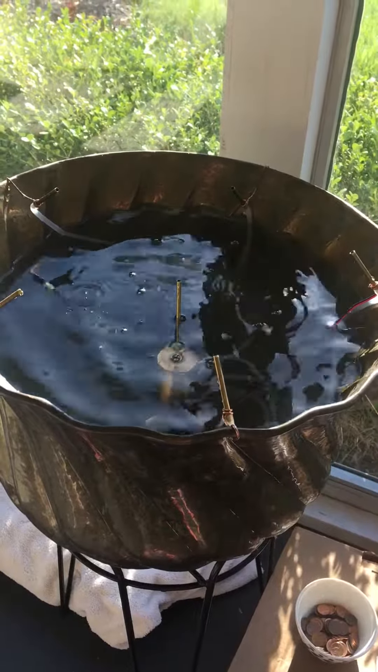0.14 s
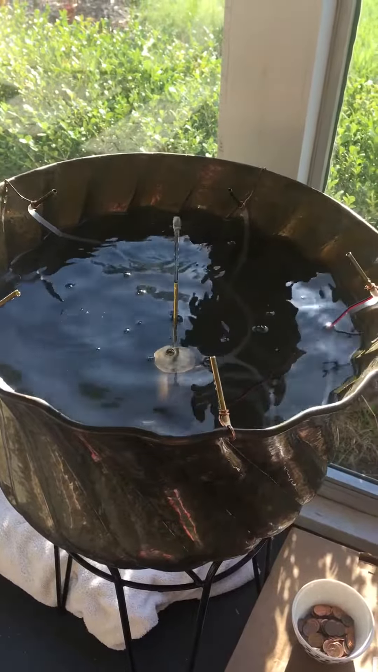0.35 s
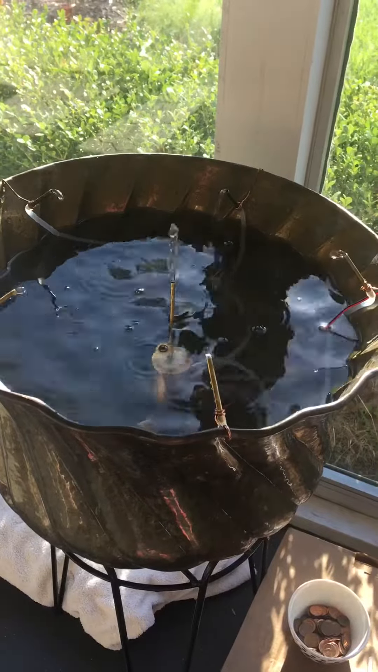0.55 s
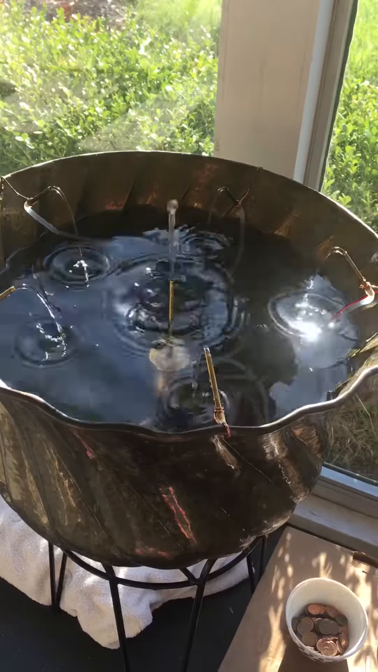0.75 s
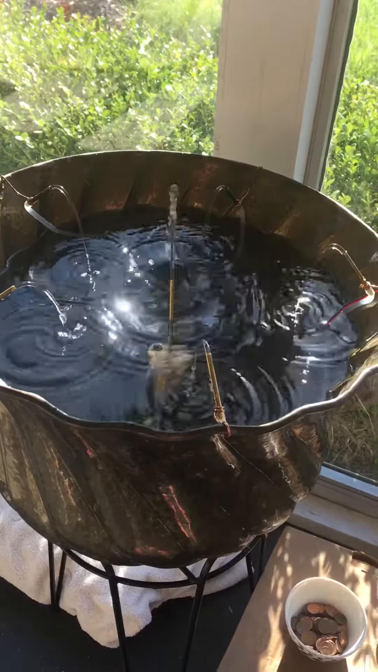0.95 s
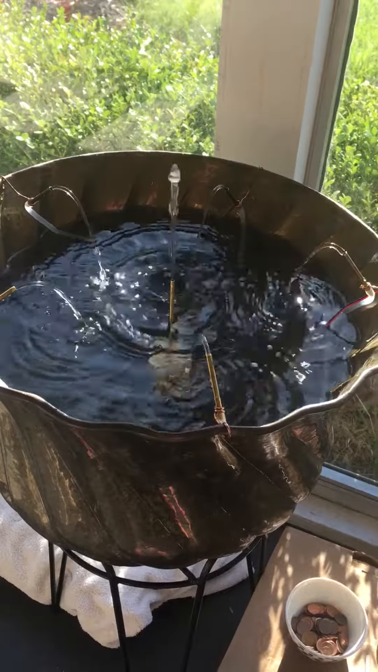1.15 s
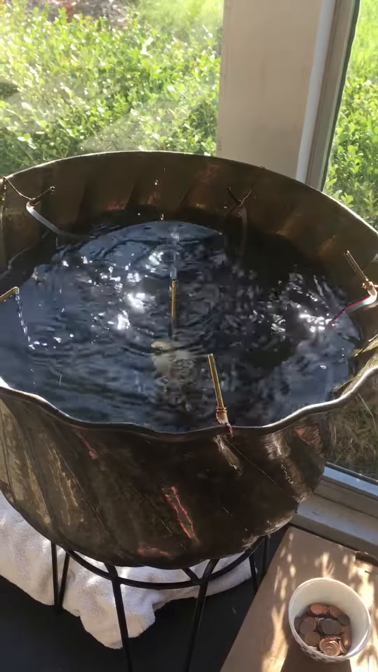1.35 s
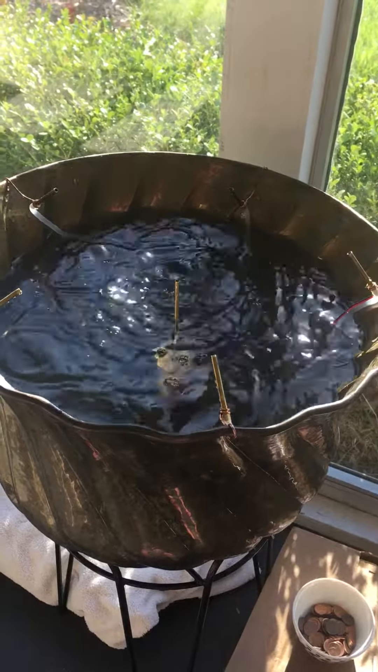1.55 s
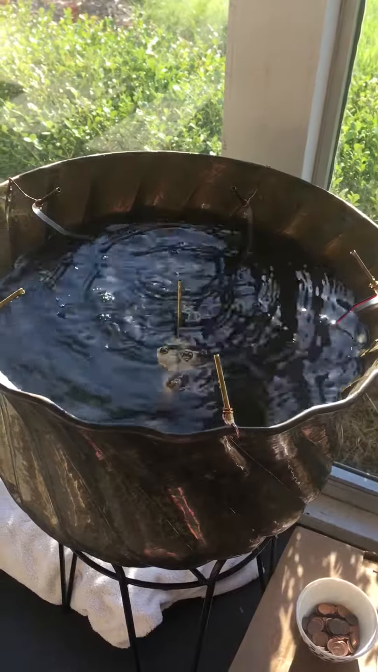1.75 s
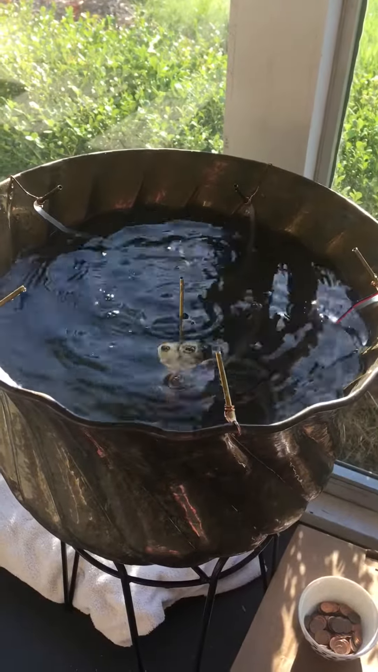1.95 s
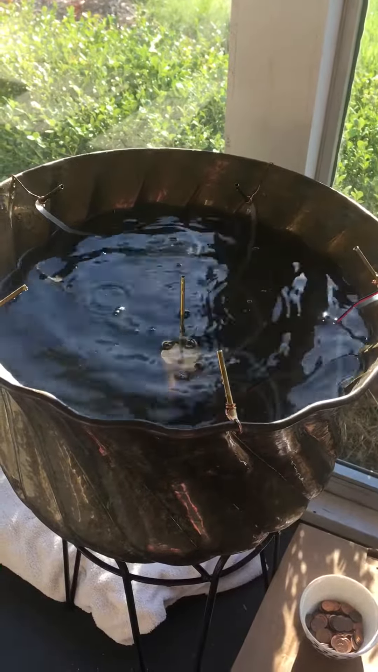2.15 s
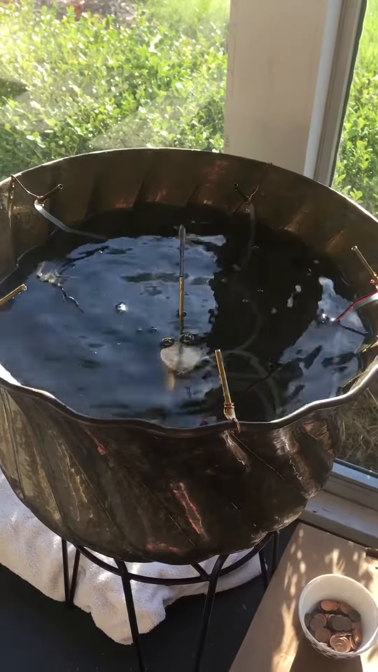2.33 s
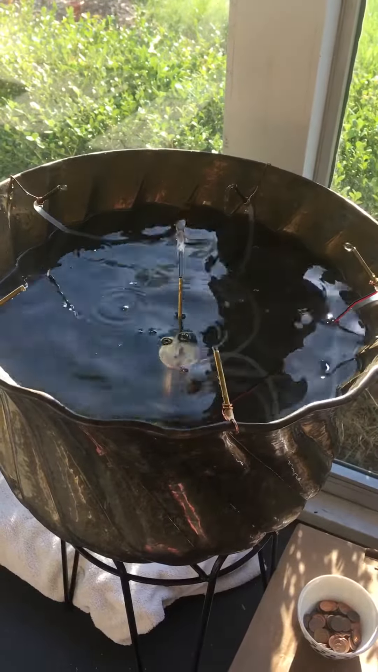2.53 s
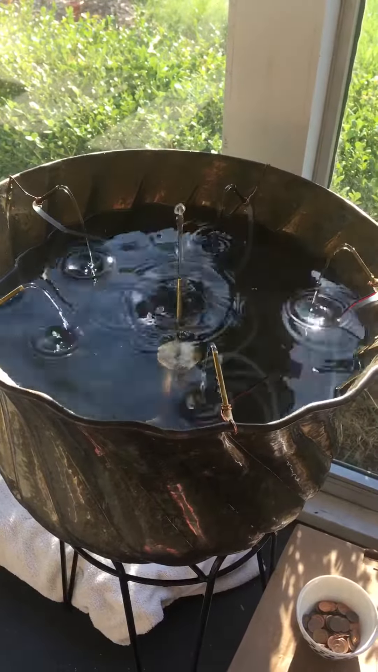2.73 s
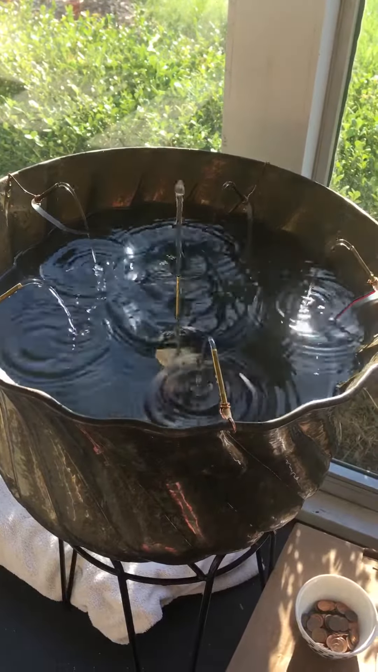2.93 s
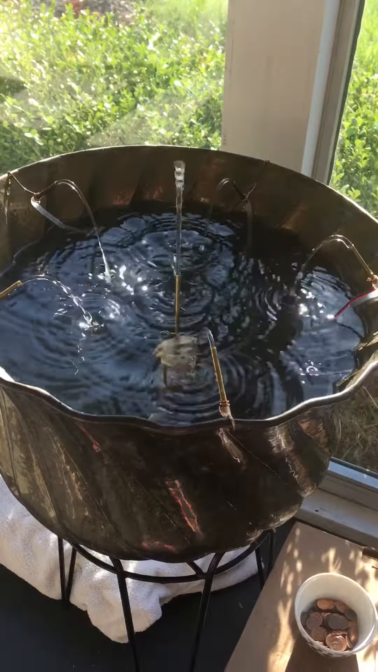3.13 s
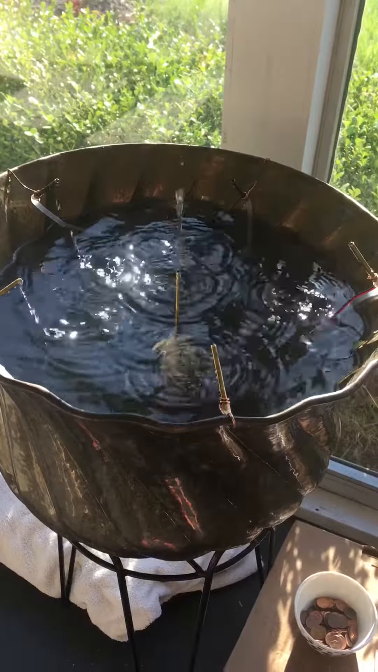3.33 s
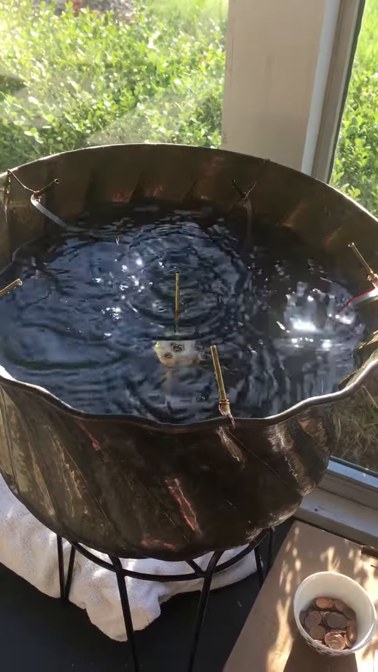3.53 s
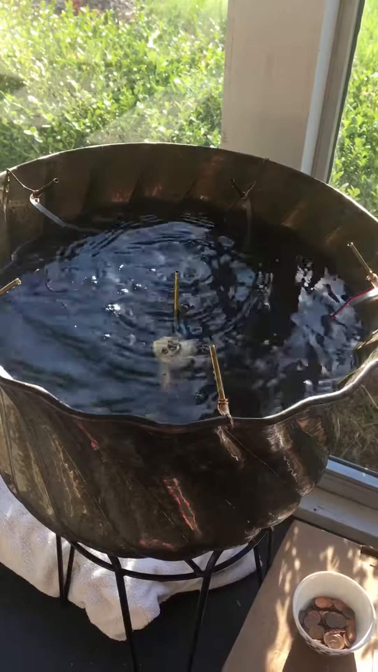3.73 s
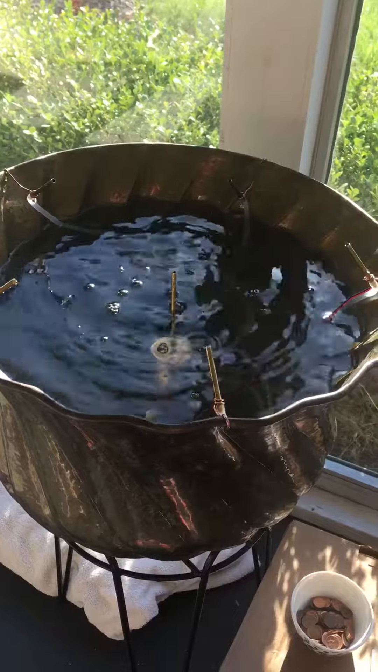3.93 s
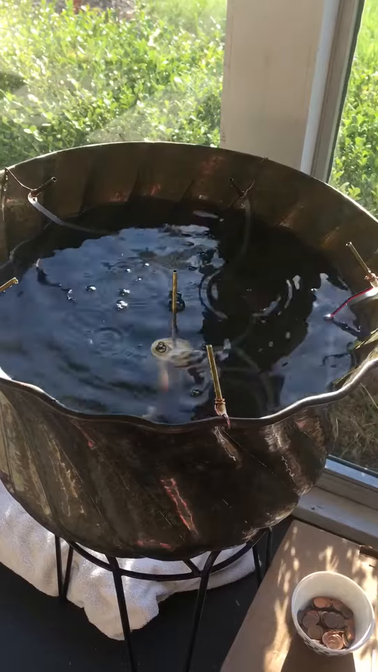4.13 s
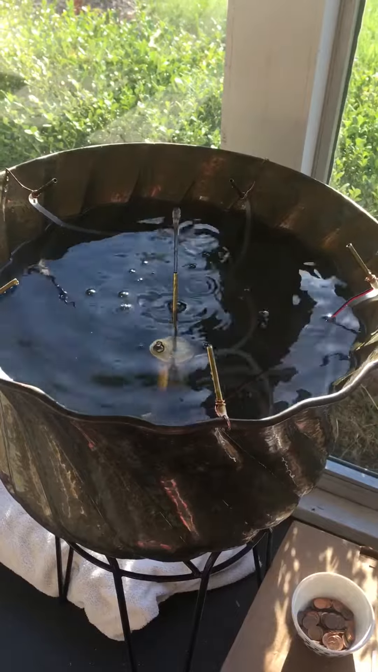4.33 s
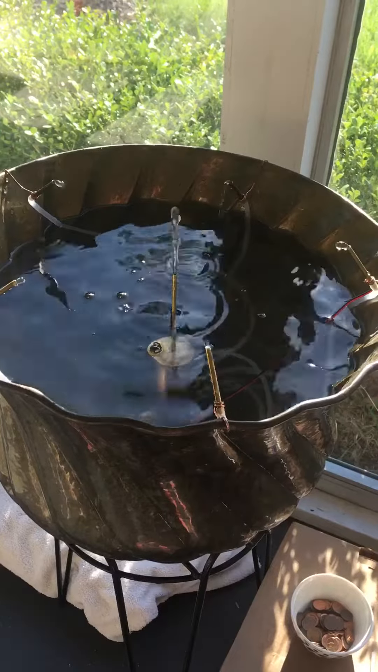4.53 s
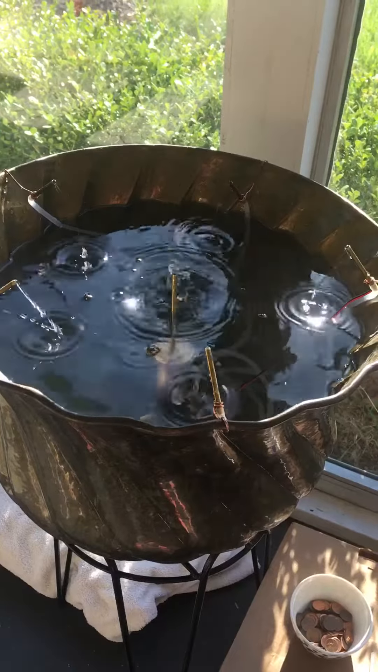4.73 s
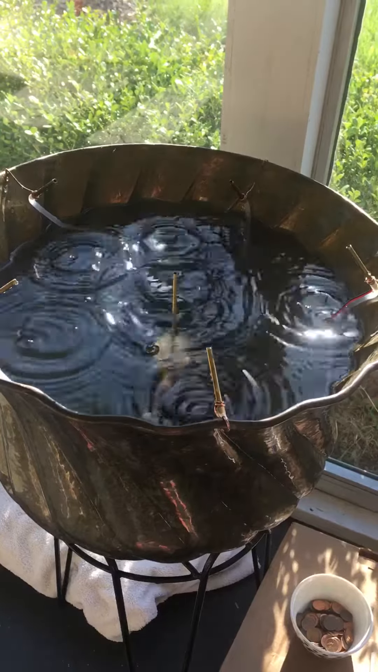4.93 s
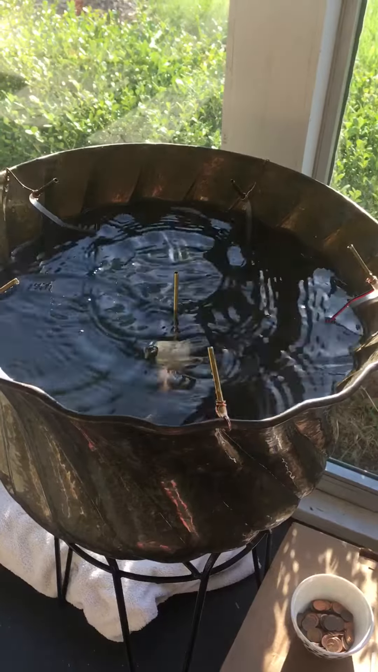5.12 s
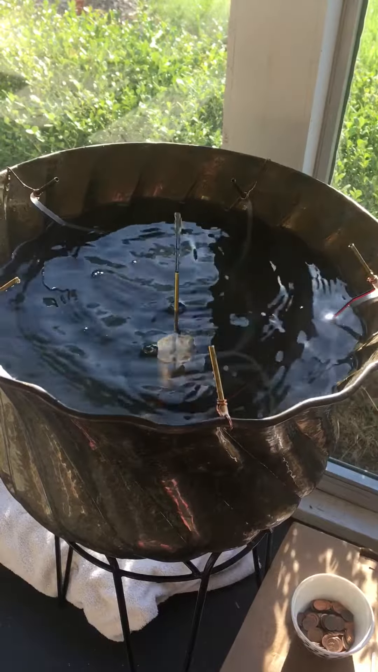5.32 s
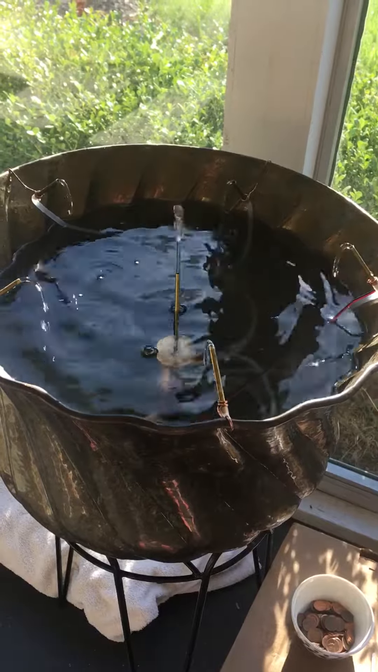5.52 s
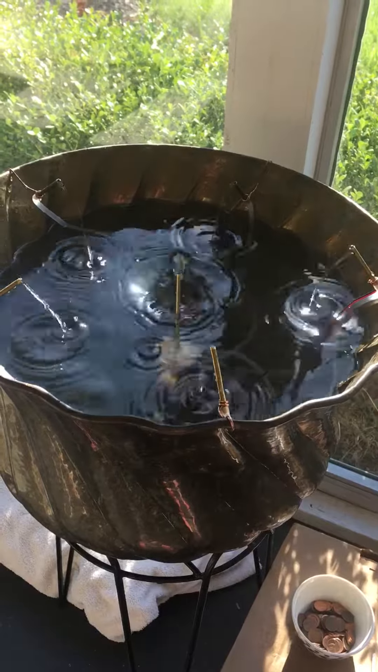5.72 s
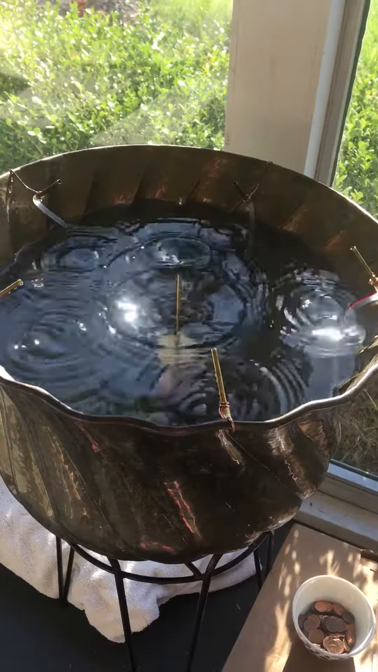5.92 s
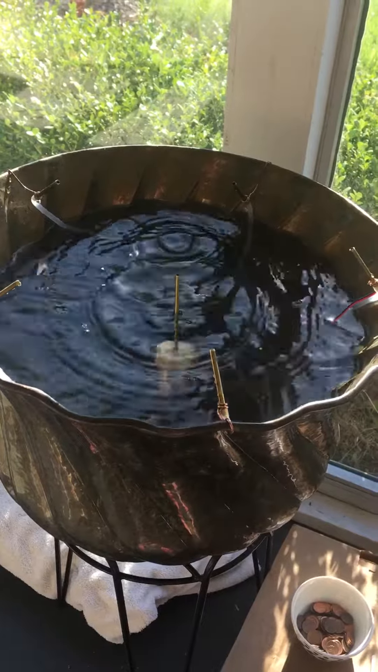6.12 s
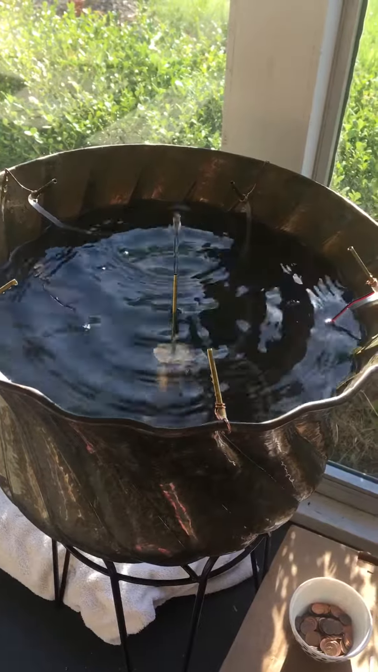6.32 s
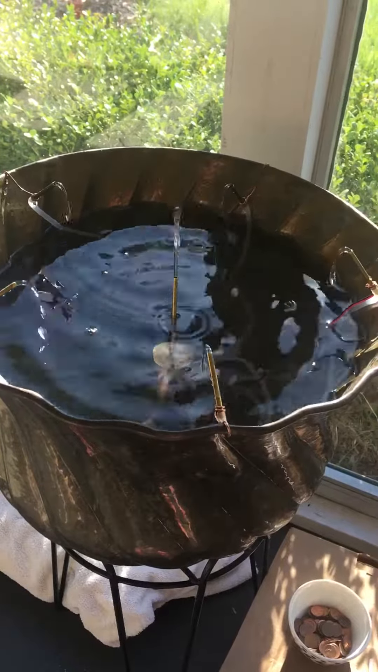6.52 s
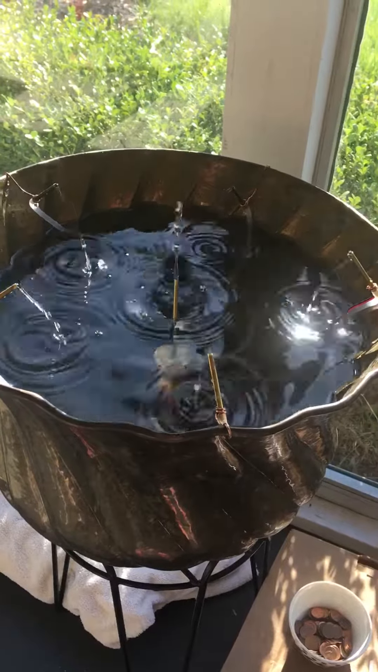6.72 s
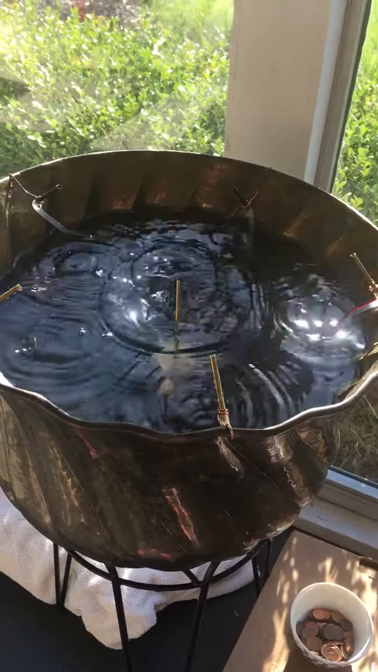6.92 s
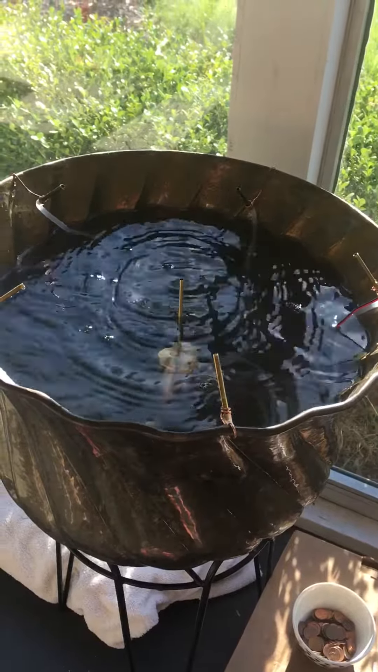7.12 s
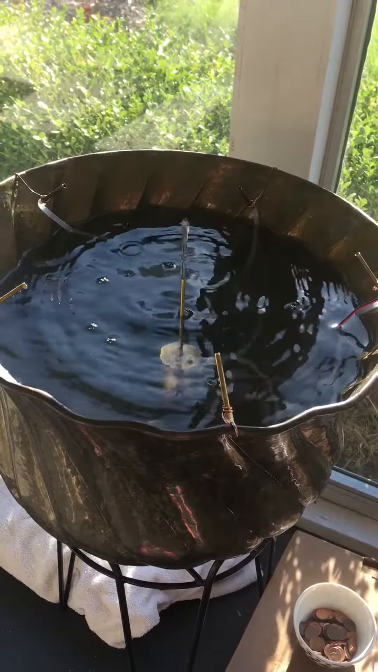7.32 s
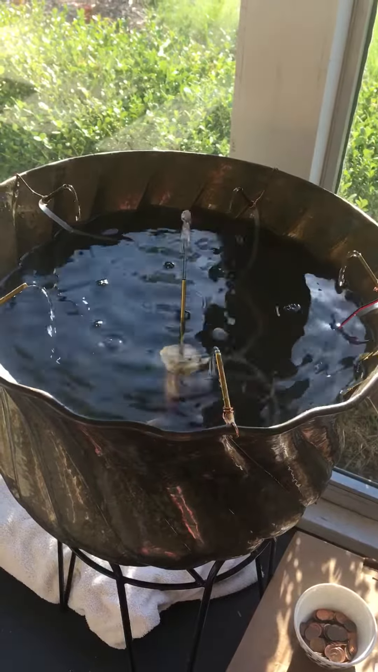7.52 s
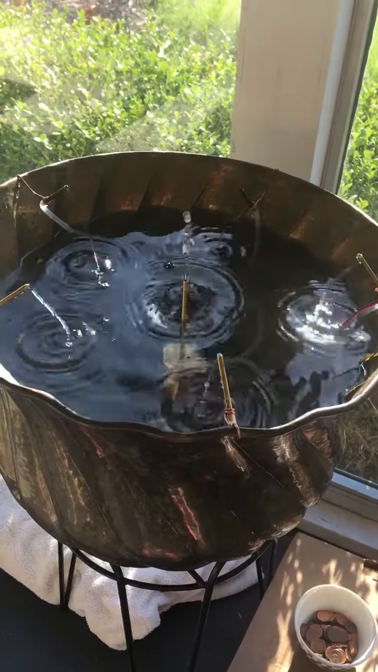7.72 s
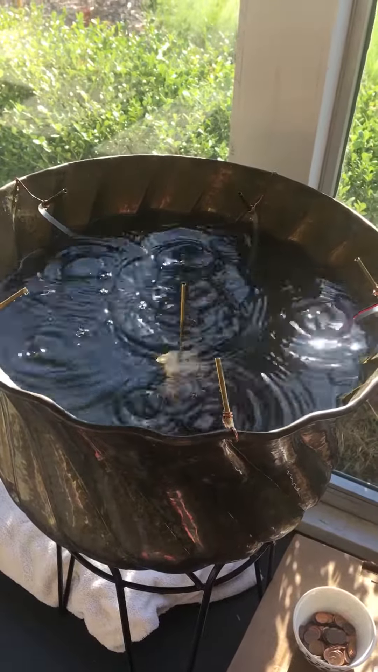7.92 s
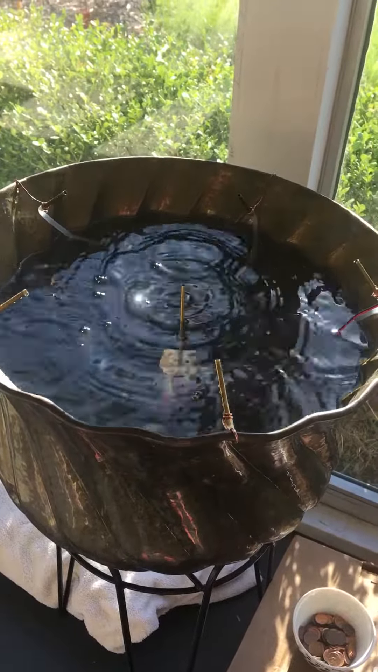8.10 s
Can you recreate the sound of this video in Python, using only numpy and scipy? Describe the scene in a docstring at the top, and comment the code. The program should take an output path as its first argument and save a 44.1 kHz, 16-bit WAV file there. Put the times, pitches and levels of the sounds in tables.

```python
"""A small table fountain plays in a metal bowl by a window: two long spurts, then four short ones.
Each spurt is a sum of decaying sines for rising bubbles, over sharp drops of ping and noise smack.
A relay that clicks the pump on and off is chattering noise in resonances; a board rings after it.
Noise tails give the bowl and a small live room. A vehicle drones past outside as engine orders and
road noise, and a faint sine hum and noise hiss stay throughout."""
import sys
import numpy as np
from scipy import signal
from scipy.fft import rfft, irfft, next_fast_len
from scipy.io import wavfile

SR = 44100
rng = np.random.default_rng(int(sys.argv[2]) if len(sys.argv) > 2 else 0)


def waveform_to_disk(signal):
    """Save audio, clipped to [-1, 1], as 16-bit WAV at the path in sys.argv[1]."""
    frames = np.transpose(np.atleast_2d(signal))
    scaled = np.clip(frames, -1, 1) * 32767
    samples = np.round(scaled).astype(np.int16)
    wavfile.write(sys.argv[1], SR, samples)


N = 364266
T = np.arange(N) / SR
CUTOFF_HZ = 16000   # top of the band
DROP_CYCLES = 29.3   # cycles in which a drop's ping decays by 60 dB


def amp(db):
    """Logarithmic level: decibels to amplitude gain."""
    return 10 ** (np.asarray(db) / 20)


def unit(x):
    """Normalisation: scale to an rms of 1."""
    return x / np.sqrt(np.mean(x ** 2) + 1e-20)


def in_time(rows):
    """Linear interpolation: each column of a time curve at every sample."""
    s, *columns = np.transpose(rows)
    return [np.interp(T, s, column) for column in columns]


def add(out, s, sound):
    """Superposition: mix a short sound in at time s."""
    i = max(0, int(s * SR))
    out[i:i + len(sound)] += sound[:max(0, N - i)]


def coloured(x, spectrum):
    """Spectral shaping: weight a steady signal over log frequency, then scale to an rms of 1."""
    hz, db = np.transpose(spectrum)
    size = next_fast_len(N)
    bins_hz = np.maximum(np.arange(size // 2 + 1) * SR / size, 1)
    gain = amp(np.interp(np.log(bins_hz), np.log(hz), db))
    return unit(irfft(rfft(x, size) * gain, size)[:N])


def drift(values_per_s):
    """Slow random modulation: straight lines between normal random values."""
    return np.interp(T * values_per_s, np.arange(N // 20), rng.standard_normal(N // 20))


def echoes(x, t60, delay_s):
    """Diffuse reverberation: dense reflections of unit energy start after a delay and decay."""
    t = np.arange(int(.6 * SR)) / SR
    tail = rng.standard_normal(len(t)) * amp(-60 * t / t60) * (t > delay_s)
    return signal.fftconvolve(x, tail / np.linalg.norm(tail))[:N]


# Swell of the hum. Each row: time in seconds, mean peak level in dB.
HUM_LEVEL = [(0, -62), (3.1, -61.5), (4.0, -70), (4.8, -73), (5.5, -60.5), (6.6, -58.5), (7.5, -66),
             (8.2, -68)]
# Spectrum of the hiss. Each row: frequency in Hz, relative density in dB per Hz.
HISS_SPECTRUM = [(100, 12), (400, 10.5), (1300, 2), (2500, 0), (4700, -6), (6300, 0.5), (9500, -8),
                 (15000, 3)]


def room_tone(hum_hz=103, hiss_db=-70.0):
    """Tone and noise floor: a wavering sine hum over faint coloured noise."""
    hum_db = in_time(HUM_LEVEL)[0] + 1.6 * drift(4.0)
    hum = amp(hum_db) * np.sin(2 * np.pi * hum_hz * T)
    return hum + amp(hiss_db) * coloured(rng.standard_normal(N), HISS_SPECTRUM)


# Engine outside. Each row: time in seconds, base rate in Hz, mean rms level of the firing tone in dB.
ENGINE_CURVE = [(0, 64.92, -64), (1.0, 66, -66), (1.7, 72, -56.5), (2.15, 73, -72), (2.65, 73.8, -48),
                (3.25, 74.35, -46), (3.55, 75, -63), (4.2, 65.64, -57.5), (4.7, 71.86, -62.5),
                (5.1, 73.3, -52), (5.38, 74.3, -65), (8.2, 73, -72.5)]
# Its overtones swell and fade as it moves. Each row: multiple of the base rate, time of the maximum
# in seconds, rms level there in dB, fall to either side in dB per second.
ENGINE_OVERTONES = [(3, .7, -63.5, 10), (2, 1.78, -58, 9.5), (3, 2.72, -57, 27), (4, 3.4, -67, 11)]
# Deep drone at the start. Each row: time in seconds, rms level in dB.
DRONE_LEVEL = [(0, -52.5), (.55, -57.5), (.9, -72.5)]
# Road noise. Each row: time in seconds, rms level in dB.
ROAD_LEVEL = [(0, -61), (1.2, -61), (2.7, -57.5), (3.7, -54.5), (4.8, -57.5), (5.7, -60.5), (6.6, -65.5),
              (8.2, -66.5)]
# Spectrum of the road noise. Each row: frequency in Hz, relative density in dB per Hz.
ROAD_SPECTRUM = [(22, -25), (45, -1), (80, 0.5), (170, -3.5), (260, -12), (450, -23), (1200, -24),
                 (2500, -35), (6000, -54)]


def traffic(waver_db=1.8, waver_hz=0.43):
    """Engine orders: tones locked to one rate, with dull road noise and a drone that soon sinks."""
    rate_hz, firing_db = in_time(ENGINE_CURVE)
    orders = [(0.98, firing_db)]   # the firing tone lies just below the base rate
    for order, peak_s, db, fall in ENGINE_OVERTONES:
        orders.append((order, db - fall * np.abs(T - peak_s)))
    phase = 2 * np.pi * np.cumsum(rate_hz + waver_hz * drift(6)) / SR
    engine = sum(amp(db + waver_db * drift(9.8)) * np.sin(order * phase) for order, db in orders)
    drone = amp(in_time(DRONE_LEVEL)[0]) * np.sin(2 * np.pi * 43 * T)
    road = amp(in_time(ROAD_LEVEL)[0]) * coloured(rng.standard_normal(N), ROAD_SPECTRUM)
    return np.sqrt(2) * (engine + drone) + road   # root 2 turns the tables' rms levels into sine peak amplitudes


# The relay pulls in. Each entry: time in seconds.
PULL_IN_TIMES = [.099, 2.098, 4.0965, 5.096, 6.095, 7.0946, 8.0937]
# Modes of the board under the relay. Each row: frequency in Hz, peak level in dB, 60 dB decay in seconds.
BOARD_MODES = [(783, -63.5, 0.39), (1105, -70, 0.56), (1830, -65.5, 0.21)]


def board():
    """Modal ringing: pulling in, the relay knocks the board it is mounted on."""
    out, t = np.zeros(N), np.arange(SR // 2) / SR
    knock = sum(amp(db - 60 * t / t60) * np.sin(2 * np.pi * hz * t) for hz, db, t60 in BOARD_MODES)
    for s in PULL_IN_TIMES:
        add(out, s, knock)
    return out


def resonance(x, hz, width_hz):
    """Damped resonator: a two-pole band-pass with gain 1 at its top."""
    r = np.exp(-np.pi * width_hz / SR)
    zeros = np.array([1, 0, -1]) * (1 - r * r) / 2
    poles = [1, -2 * r * np.cos(2 * np.pi * hz / SR), r * r]
    return signal.lfilter(zeros, poles, x)


# The relay lets go. Each entry: time in seconds.
LET_GO_TIMES = [1.0996, 3.099, 4.597, 5.5956, 6.596, 7.594]
# Modes of the relay body. Each row: frequency in Hz, relative level in dB pulling in, and letting go.
HOUSING_MODES = [(338, -50, -69), (880, -48, -62), (1160, -61.5, -79), (1930, -58.5, -59),
                 (3130, -54, -56.5), (3740, -55, -48), (5930, -45, -43), (6220, -67, -43.5),
                 (8560, -33, -72), (8750, -37, -36.5), (9400, -41, -31.5), (10160, -67.5, -40),
                 (13360, -48, -32), (14400, -47, -41), (14900, -42, -33)]


def relay(times, column, chatter_s, fall_db_per_s, width_hz=300):
    """Source and filter: contact chatter, nearly alike at every switch, excites the housing's modes."""
    out, t = np.zeros(N), np.arange(SR // 50) / SR
    attack = np.minimum(t / 0.00073, 1)
    shape = attack * amp(-fall_db_per_s * np.maximum(t - chatter_s, 0))
    strength = np.sqrt(np.mean(shape ** 2) / 2)
    habits = rng.standard_normal((len(HOUSING_MODES), len(t)))   # the part every switch shares
    for mode, habit in zip(HOUSING_MODES, habits):
        for s in times:
            chatter = shape * (habit + .5 * rng.standard_normal(len(t)))
            ringing = resonance(chatter, mode[0], width_hz + .025 * mode[0])
            add(out, s, amp(mode[column]) * unit(ringing) * strength)
    return out


def bubble(hz, t60, rise):
    """Bubble resonance: an air pocket rings, and with rise > 0 climbs as it nears the surface."""
    t = np.arange(int(t60 * SR) + 2) / SR
    pitch = np.minimum(hz * (1 + rise * t), CUTOFF_HZ)
    onset = 1 - np.exp(-t * hz / 0.7)
    return np.sin(2 * np.pi * np.cumsum(pitch) / SR) * amp(-60 * t / t60) * onset


def pop(hz, t60, ping_db=-9.0, smack_db=-7.5, smack_t60=0.001, edge=0.49):
    """Drop impact: a tiny bubble's ping and a short noise smack, with little sound below its pitch."""
    t = np.arange(SR // 100) / SR
    ping = np.sin(2 * np.pi * hz * t) * amp(-60 * t / t60)
    smack = rng.standard_normal(len(t)) * amp(-60 * t / smack_t60)
    smack *= np.linalg.norm(ping) / np.linalg.norm(smack)   # equal energy
    impact = amp(ping_db) * ping + amp(smack_db) * smack
    # two-pole high-pass near edge times the pitch, used twice
    r = np.exp(-2 * np.pi * edge * hz / SR / np.sqrt(2))
    poles = [1, -2 * r * np.cos(np.log(r)), r * r]
    zeros = np.array([1, -2, 1]) * (1 - poles[1] + poles[2]) / 4
    return signal.lfilter(zeros, poles, signal.lfilter(zeros, poles, impact))


# Falling water, one row per spurt. Each row: start in seconds, end in seconds, relative level of the
# deeper bubbles in dB, relative level of the spray and fine sounds in dB.
SPURT_TIMES = [(.74, 1.32, -50.5, -59), (2.71, 3.381, -50, -58), (4.595, 4.789, -66.5, -69.5),
               (5.634, 5.775, -48.5, -58.5), (6.621, 6.753, -49.5, -58.5), (7.63, 7.763, -51, -62.5)]


def foam(level_db=-38.7, spread_db=23, linger_s=.8, low_hz=7000, cycles=22, count=1100):
    """Inhomogeneous random process: count tiny film bursts gather to each spurt's end, then thin out."""
    rate = 0.17   # some bursts at any time; long spurts leave more
    for start, end, *_ in SPURT_TIMES:
        rate = rate + (end - start) * np.exp(-np.abs(T - end) / linger_s) * (T > start)
    chance = rng.random((count, 3))
    times = np.interp(chance[:, 0], np.cumsum(rate) / rate.sum(), T)
    out = np.zeros(N)
    for s, (_, size, strength) in zip(times, chance):
        hz = low_hz * (CUTOFF_HZ / low_hz) ** np.sqrt(size)
        db = level_db - spread_db * np.sqrt(strength)
        add(out, s, amp(db) * bubble(hz, cycles / hz, 0))
    return out


def fizz(level_db=13, spread_db=14, low_hz=2400, octaves=1.45, cycles=18, rise=60, overhang_s=.03,
         count=520):
    """Air entrainment: the splash whips in small short-lived bubbles, count per second of spurt."""
    out = np.zeros(N)
    for start, end, _, db in SPURT_TIMES:
        for when, size, strength in rng.random((int((end - start) * count), 3)):
            s = start + when * (end - start + overhang_s)
            hz = low_hz * 2 ** (octaves * size)
            gain = amp(db + level_db - spread_db * strength)
            add(out, s, gain * bubble(hz, cycles / hz, rise))
    return out


def spray(level_db=35, spread_db=30, count=420, low_hz=5200, cycles=28):
    """Droplet impacts: count a second land all through each spurt; most are faint, a few stand out."""
    out = np.zeros(N)
    for start, end, _, db in SPURT_TIMES:
        slots = np.arange(start, end, 1 / count)
        for s, (late, size, strength) in zip(slots, rng.random((len(slots), 3))):
            hz = low_hz * (CUTOFF_HZ / low_hz) ** size
            gain = amp(db + level_db - spread_db * np.sqrt(strength))
            add(out, s + late * 2 / count, gain * pop(hz, cycles / hz))
    return out


def chirps(level_db=23, spread_db=9, low_hz=2400, octaves=1.1, cycles=34, rise=70, lead_s=.015,
           linger_s=.06, fade_db_per_s=110, count=36):
    """Rising bubble resonance: drops trap small bubbles, count a second, fainter outside the spurt."""
    out = np.zeros(N)
    for start, end, _, db in SPURT_TIMES:
        slots = np.arange(start - lead_s, end + linger_s, 1 / count)
        for s, (late, size, lift, strength) in zip(slots, rng.random((len(slots), 4))):
            hz = low_hz * 2 ** (octaves * size)
            faded_db = fade_db_per_s * max(start - s, s - end, 0)
            gain = amp(db + level_db - faded_db - spread_db * strength)
            add(out, s + late / count, gain * bubble(hz, cycles / hz, rise * lift))
    return out


def patter(level_db=39.5, spread_db=9, low_hz=5000, high_hz=14500, soft_start_db=9, build_s=0.11,
           count=42):
    """Jet breakup: count drops a second, which hit harder once the jet has reached its full height."""
    out = np.zeros(N)
    for start, end, _, db in SPURT_TIMES:
        slots = np.arange(start, end, 1 / count)
        for s, (late, size, strength) in zip(slots, rng.random((len(slots), 3))):
            hz = low_hz * (high_hz / low_hz) ** np.sqrt(size)
            soft_db = soft_start_db * np.exp((start - s) / build_s)
            gain = amp(db + level_db - soft_db - spread_db * strength)
            add(out, s + late / count, gain * pop(hz, DROP_CYCLES / hz))
    return out


# Single drops: the first and last of a spurt and the hardest hits.
# Each row: time in seconds, pitch in Hz, relative level in dB.
SINGLE_DROPS = [(0.614, 14500, -23), (0.693, 5450, -31.5), (0.7255, 9500, -23.5), (0.753, 14500, -20.5),
                (0.8397, 13500, -23), (0.8832, 14600, -14.5), (0.8906, 11000, -23), (0.8968, 9100, -24),
                (.969, 14500, -20.5), (1.0376, 13400, -20), (1.0503, 4300, -26.5), (1.0907, 14400, -22),
                (1.1291, 5600, -18), (1.162, 14500, -17), (1.259, 9500, -21.5), (1.2926, 14200, -10.5),
                (1.3055, 6700, -15.5), (1.393, 14400, -15.5), (1.4054, 6460, -22.5), (2.6034, 8100, -32),
                (2.619, 7590, -26.5), (2.6676, 14800, -23), (2.7142, 7060, -17.5), (2.73, 13400, -15),
                (2.78, 9500, -15), (2.8184, 11500, -14), (2.8493, 12600, -15), (2.89, 11400, -19),
                (2.9516, 14110, -16), (2.9728, 6230, -18), (3.1451, 10900, -10), (3.2175, 6960, -25),
                (3.316, 9390, -19.5), (3.328, 4270, -23), (3.3949, 12100, -19), (4.702, 4540, -33.5),
                (4.7319, 9700, -14), (4.7553, 13640, -25), (4.8192, 13820, -12.5), (4.845, 5360, -37.5),
                (5.022, 11200, -37.5), (5.581, 4490, -41), (5.6112, 10600, -20.5), (5.754, 13100, -26),
                (6.5293, 15000, -25.5), (6.621, 7340, -23), (6.6466, 14560, -17), (6.686, 6100, -15.5),
                (6.7877, 3970, -28), (6.863, 4430, -32.5), (7.419, 9150, -41), (7.6312, 8900, -10),
                (7.647, 9700, -17), (7.663, 5800, -21), (7.7805, 9000, -30.5), (7.8206, 9250, -28)]


def drops(level_db=4.0):
    """Drop impact: the sharp single hits that stand out of each spurt."""
    out = np.zeros(N)
    for s, hz, db in SINGLE_DROPS:
        add(out, s, amp(db + level_db) * pop(hz, DROP_CYCLES / hz))
    return out


def gurgle(level_db=10.7, first_hz=2800, deepest_hz=1100, deepen_s=0.0488, octaves=1.94, cycles=42,
           rise=80, spread_db=13, count=210):
    """Size sets pitch: as the landing jet digs deeper, larger bubbles soon join in, count a second."""
    out = np.zeros(N)
    for start, end, db, _ in SPURT_TIMES:
        slots = np.arange(start, end, 1 / count)
        for s, (late, size, lift, strength) in zip(slots, rng.random((len(slots), 4))):
            lowest_hz = deepest_hz + (first_hz - deepest_hz) * np.exp((start - s) / deepen_s)
            hz = lowest_hz * 2 ** (octaves * size ** 2)
            gain = amp(db + level_db - spread_db * strength)
            add(out, s + late * 2 / count, gain * bubble(hz, cycles / hz, rise * lift))
    return out


def gulps(level_db=15.5, spread_db=8, first_hz=1550, deepest_hz=1050, deepen_s=0.198, octaves=0.808,
          cycles=52, rise=60, soft_start_db=9, build_s=0.14, count=34):
    """Air entrainment: the jet drags count pockets a second under, larger and louder as it digs in."""
    out = np.zeros(N)
    for start, end, db, _ in SPURT_TIMES:
        slots = np.arange(start, end, 1 / count)
        for s, (late, size, lift, strength) in zip(slots, rng.random((len(slots), 4))):
            lowest_hz = deepest_hz + (first_hz - deepest_hz) * np.exp((start - s) / deepen_s)
            hz = lowest_hz * 2 ** (octaves * size ** 2)
            soft_db = soft_start_db * np.exp((start - s) / build_s)
            gain = amp(db + level_db - soft_db - spread_db * strength)
            # most pockets glide up only a little, a few chirp strongly
            add(out, s + (2 * late - 1) / count, gain * bubble(hz, cycles / hz, rise * lift ** 2))
    return out


# Single plinks: the bubbles that stand out. Each row: time in seconds, starting pitch in Hz,
# relative level in dB, 60 dB decay in seconds, pitch rise in starting pitches per second
# (negative falls).
SINGLE_BUBBLES = [(.631, 2240, -42.5, 0.031, 1), (.693, 2120, -33, 0.029, -4.5),
                  (0.718, 1040, -48, 0.13, 1.5), (.752, 1360, -37, 0.035, 23),
                  (.764, 2360, -31.5, 0.015, 87), (0.78, 2370, -24, 0.0076, 0),
                  (.818, 1746, -32.5, 0.033, -5), (.823, 2384, -31.5, 0.034, 82),
                  (.842, 2210, -31.5, 0.021, -2), (0.901, 1560, -28, 0.018, 23), (1.091, 660, -30, .08, 2),
                  (1.217, 1390, -23.5, .019, 52), (1.285, 954, -39, .064, 0), (1.328, 854, -41.5, .05, 2),
                  (1.351, 3250, -29, 0.01, 13), (1.408, 800, -41.5, .12, 3.5), (1.408, 2300, -29, 0.01, -7),
                  (2.631, 3020, -37.5, 0.017, 1), (2.702, 2100, -34.5, .031, 16),
                  (2.721, 1392, -37, 0.12, -4.5), (2.814, 2095, -32.5, 0.055, 21.5),
                  (2.848, 1160, -29.5, 0.033, 24), (2.908, 1220, -31.5, 0.032, 10),
                  (3.102, 1220, -27.5, 0.033, 7), (3.184, 1670, -26.5, 0.026, 104),
                  (3.204, 673, -39, 0.16, 3), (3.274, 2190, -30, .024, -24), (3.328, 840, -32, 0.035, 28),
                  (3.339, 1290, -28.5, 0.029, 13), (3.346, 723, -25.5, .047, 42.5),
                  (3.362, 1280, -26, 0.036, 19.5), (4.609, 2960, -44.5, .012, 1),
                  (4.629, 3780, -32, 0.011, -2), (4.714, 2230, -34.5, 0.018, -13),
                  (4.756, 1932, -35, 0.023, -11), (4.772, 1620, -40, .018, -11),
                  (4.818, 1240, -35.5, .023, -3), (5.643, 1834, -38, 0.054, 1.5),
                  (5.665, 3480, -28.5, .012, 13), (5.702, 671, -41, .14, 2), (5.718, 1445, -36, .032, 38),
                  (5.744, 1730, -33.5, .028, 0), (5.754, 3380, -29, .01, 15), (5.779, 1350, -38, .03, 60),
                  (6.647, 1640, -32, 0.059, 6.5), (6.647, 2690, -21.5, 0.0073, -4),
                  (6.689, 1540, -33, 0.047, 13), (6.712, 1310, -32.5, .03, 38),
                  (6.771, 1510, -35.5, 0.052, 3), (6.816, 2650, -37, 0.02, 4),
                  (7.551, 3320, -31.5, 0.012, -7), (7.625, 2590, -32.5, .018, 0),
                  (7.633, 3600, -31, .01, -4), (7.638, 2880, -25, 0.0066, 4),
                  (7.692, 1140, -34.5, 0.08, 9.5), (7.694, 1640, -31, 0.025, -3),
                  (7.712, 1250, -33, .029, 23), (7.751, 1022, -38.5, 0.089, 14.5),
                  (7.821, 3440, -40.5, .014, 7)]


def single_bubbles(level_db=-2.5):
    """Bubble resonance: the single plinks that stand out of each spurt."""
    out = np.zeros(N)
    for s, hz, db, t60, rise in SINGLE_BUBBLES:
        add(out, s, amp(db + level_db) * bubble(hz, t60, rise))
    return out


def scene():
    """Shared reverberation: water and relay excite one room, where the sharper sounds die sooner."""
    plinks = single_bubbles() + gulps() + gurgle()
    ticks = drops() + patter() + chirps() + spray() + fizz() + foam()
    water = plinks + ticks
    bowl = amp(-6.5) * echoes(water, t60=0.0094, delay_s=.0012)   # reflections off the metal wall
    clicks = relay(PULL_IN_TIMES, 1, chatter_s=0.002, fall_db_per_s=3200)
    clicks = clicks + relay(LET_GO_TIMES, 2, chatter_s=0.0017, fall_db_per_s=7000)
    room = amp(-7.5) * echoes(plinks, t60=0.4, delay_s=0.004)
    room = room + echoes(amp(-10.5) * ticks + amp(-4) * clicks, t60=0.33, delay_s=0.004)
    return (water + bowl + clicks + board() + room + traffic() + room_tone())[None]


def record(dry):
    """Band limiting: a steep elliptic low-pass cuts the top."""
    low_pass = signal.ellip(12, .2, 80, CUTOFF_HZ, fs=SR, output="sos")
    return signal.sosfilt(low_pass, dry)


dry = scene()
out = record(dry)
waveform_to_disk(out)
```